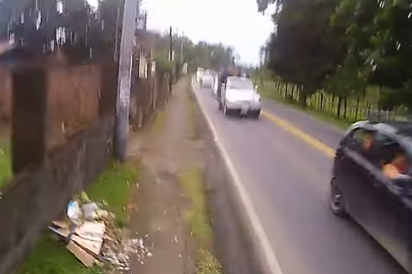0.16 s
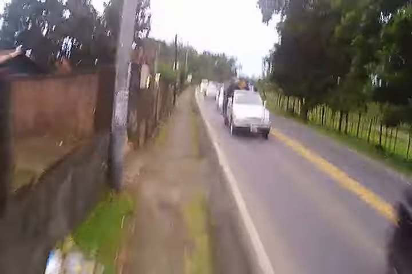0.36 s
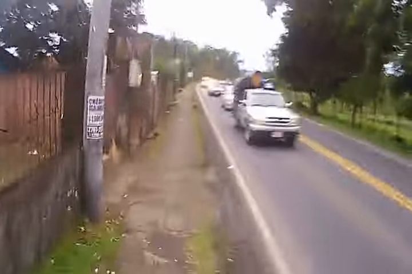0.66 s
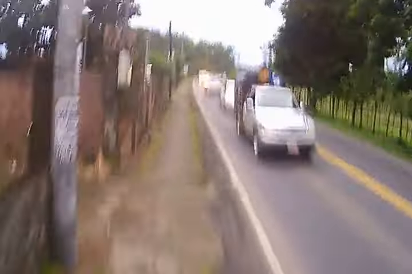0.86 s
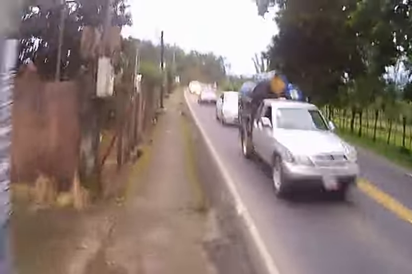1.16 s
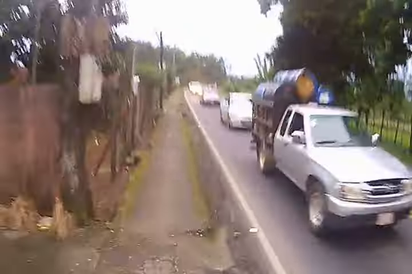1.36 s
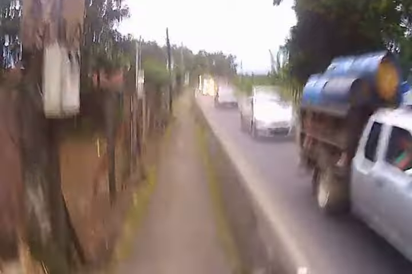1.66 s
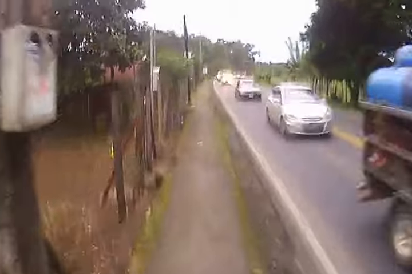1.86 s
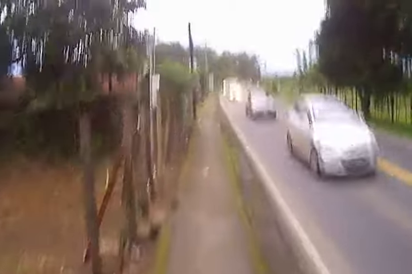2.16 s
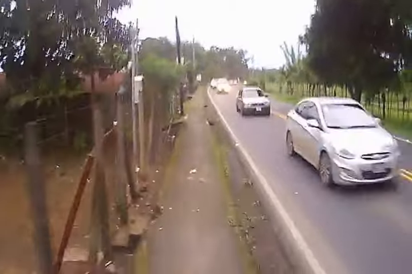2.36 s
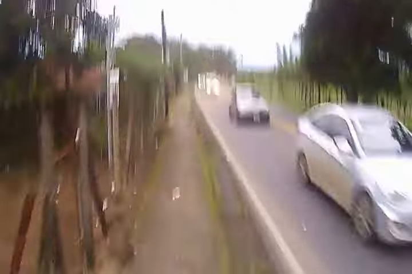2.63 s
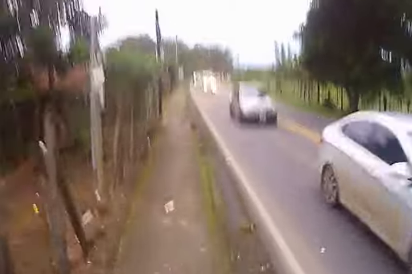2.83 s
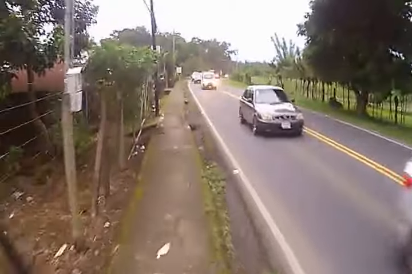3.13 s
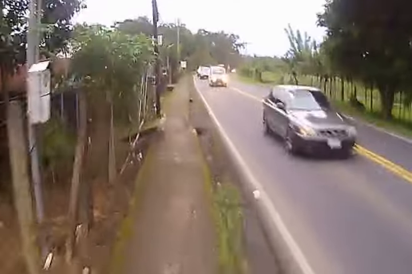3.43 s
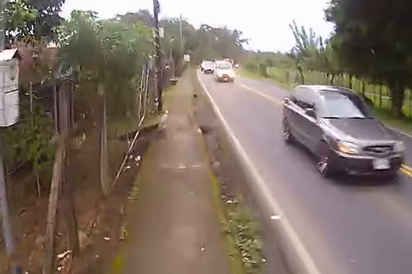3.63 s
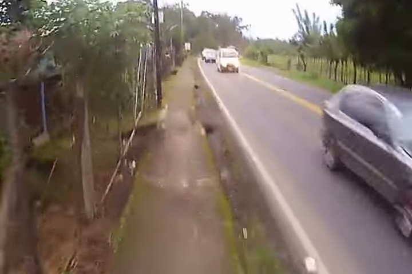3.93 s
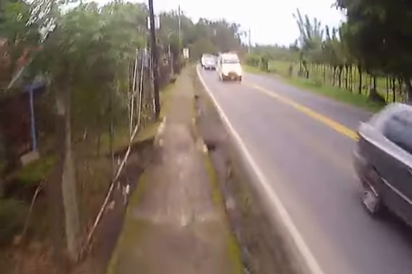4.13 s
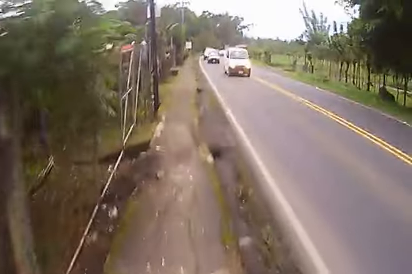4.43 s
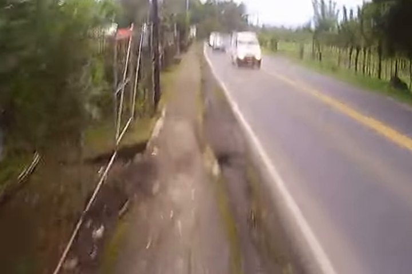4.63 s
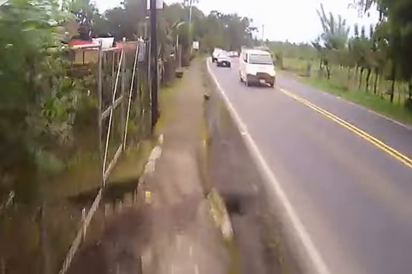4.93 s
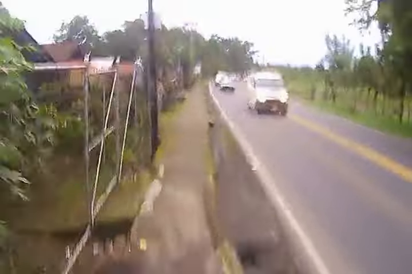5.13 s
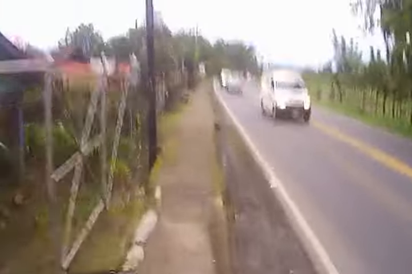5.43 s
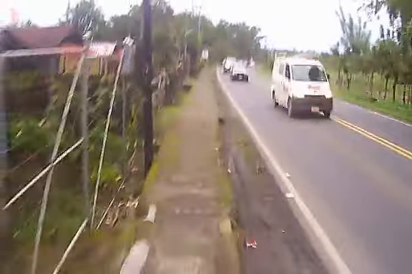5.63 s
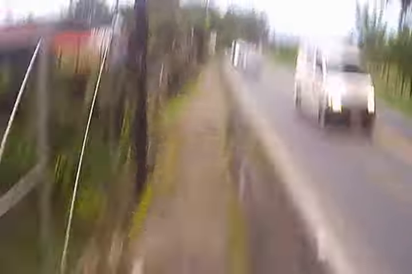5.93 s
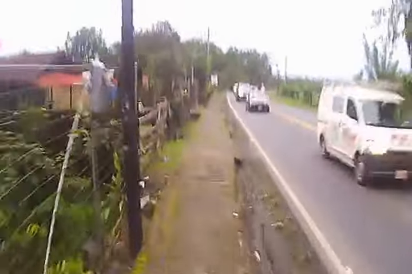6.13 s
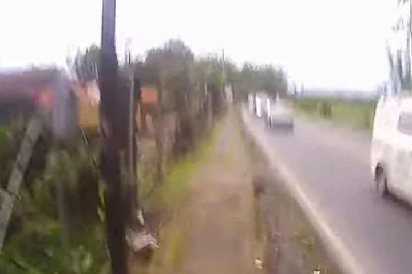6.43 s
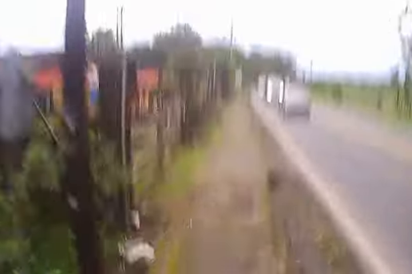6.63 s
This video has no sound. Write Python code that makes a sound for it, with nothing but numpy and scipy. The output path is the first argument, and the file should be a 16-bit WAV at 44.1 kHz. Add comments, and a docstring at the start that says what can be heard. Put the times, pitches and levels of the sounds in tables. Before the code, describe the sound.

A loose plastic camera case knocks and rattles in quick dry clusters over low ride rumble, with deep bump thuds peaking midway.

```python
"""On a rough path beside a country road, a camera in a plastic case rides on a bicycle.
The loose case knocks in its mount in quick clusters: short contact forces ring its modes.
Bumps shake the mount with deep heaves (smooth pulses) and thuds (damped low modes), and set it
creaking (bursts of band-passed noise) and chattering (random soft contacts).
Under them lie the steady rumble of the ride, road noise and a faint hiss, all shaped from noise."""
import sys
import numpy as np
from scipy import signal
from scipy.fft import rfft, irfft
from scipy.io import wavfile
from scipy.ndimage import uniform_filter1d

SR = 44100
rng = np.random.default_rng(int(sys.argv[2]) if len(sys.argv) > 2 else 0)


def master_out(mix):
    """Clip the mix to full scale and print it as 16-bit PCM to the path in sys.argv[1]."""
    frames = np.transpose(np.atleast_2d(mix))
    ceiling = np.clip(frames, -1, 1)
    pcm = np.round(ceiling * 32767).astype(np.int16)
    wavfile.write(sys.argv[1], SR, pcm)


N = 298998
TIME = np.arange(N) / SR


def undb(db):
    """Level to amplitude: twenty decibels are a factor of ten."""
    return 10 ** (np.asarray(db) / 20)


def unit(x):
    """Normalisation to an rms of 1."""
    return x / np.sqrt(np.mean(x ** 2))


def add(track, start_s, sound):
    """Superposition: mix a sound into a track at a given time."""
    i = max(int(start_s * SR), 0)
    part = sound[:max(N - i, 0)]
    track[i:i + len(part)] += part


def filtered(x, hz, kind, order=2):
    """Butterworth low-pass or high-pass, maximally flat in its passband."""
    sos = signal.butter(order, min(hz, SR * 9 / 20), kind, fs=SR, output="sos")
    return signal.sosfilt(sos, x)


def resonance(x, hz, width_hz):
    """Two-pole resonator: a band-pass around one frequency."""
    b, a = signal.iirpeak(min(hz, SR * 9 / 20), hz / width_hz, fs=SR)
    return signal.lfilter(b, a, x)


def noise(points):
    """Spectral shaping: white noise weighted by (Hz, dB) points, then scaled to rms 1."""
    hz, db = np.transpose(points)
    f = np.maximum(np.fft.rfftfreq(N, 1 / SR), 1)
    weight = undb(np.interp(np.log(f), np.log(hz), db))
    return unit(irfft(rfft(rng.standard_normal(N)) * weight, N))


def walk(rate):
    """Smoothed random steps, rate per second: a slow drift with an rms of 1."""
    k = int(SR / rate)
    steps = np.repeat(rng.standard_normal(N // k + 1), k)
    return unit(uniform_filter1d(steps, k)[:N])


def bands(rows):
    """Noise-fed narrow resonances, each with its own amplitude and frequency modulation."""
    out = 0
    for hz, width_hz, db in rows:
        band = rng.standard_normal(N)
        for _ in range(2):
            band = resonance(band, hz, 0.93 * width_hz)
        waver_db = 1.7 * walk(9) + .7 * walk(2)
        drift_hz = 20 * walk(4)
        # turning the phase of the analytic signal shifts the pitch
        turn = np.exp(2j * np.pi * np.cumsum(drift_hz) / SR)
        band = (signal.hilbert(band) * turn).real
        out = out + undb(db + waver_db) * unit(band)
    return out


def ride(rumble_db=-47, road_db=2.0, hiss_db=-77, hiss_top_hz=11900):
    """Stationary broadband rumble, road noise coloured by cavity resonance, hiss and thin tones."""
    # Steady rumble of the ride, tyres and traffic heard through the case.
    # Each row: frequency in Hz, relative spectral level in dB per Hz.
    rumble_spectrum = [(10, 1), (20, -8), (30, -17.5), (45, -28), (70, -29.5), (120, -48), (195, -42.5),
                       (350, -48.5), (600, -52), (1000, -52.5), (2000, -59.5), (3000, -68), (8000, -103)]
    # Air resonances of the case. Each row: frequency in Hz, nominal width in Hz, relative level in dB.
    hollow_bands = [(1282, 160, -99), (1576, 320, -95.5), (1896, 210, -95.5)]
    # Loudness of tyres and traffic. Each row: time in seconds, level in dB before road_db.
    road_level = [(0.03, -80), (1.35, -85.5), (3.5, -86), (3.76, -78), (3.91, -71), (4.15, -81.5),
                  (6.51, -82), (6.7, -81.5)]
    # Thin whine in the hiss. Each row: frequency in Hz, nominal width in Hz, level in dB before its course.
    whine_bands = [(8600, 480, -89.5)]
    # The whine comes and goes. Each row: time in seconds, gain in dB.
    whine_course = [(.7, -11), (1, 0), (1.6, 0), (2, -9), (3.1, -10), (3.35, 0), (4.1, 0), (4.5, -8),
                    (5.4, -9), (5.7, -1), (6.45, -1), (6.65, -9)]
    # Fainter whistle above it. Each row: frequency in Hz, nominal width in Hz, level in dB before wavering.
    whistle_bands = [(13720, 180, -93)]
    rumble = undb(rumble_db) * noise(rumble_spectrum)
    road = undb(road_db + np.interp(TIME, *np.transpose(road_level))) * unit(bands(hollow_bands))
    hiss = undb(hiss_db) * filtered(rng.standard_normal(N), hiss_top_hz, "low", order=1)
    whine = undb(np.interp(TIME, *np.transpose(whine_course))) * bands(whine_bands)
    return rumble + road + whine + bands(whistle_bands) + hiss


def contacts(rebound_tick_db=11.5):
    """Rebound after impact: yields each contact's time (s), level, low ring and hard tick (dB)."""
    # The loose case clacks against its mount and rebounds. Each row: start in seconds, level in dB,
    # hollow low ring in dB, hard tick in dB, delay of the rebound in seconds, its relative level in dB.
    knock_rows = [(.438, -54.5, 3, 7, 0.0063, 0.5), (0.4539, -66, 2, 0, .002, -11),
                  (.495, -54, 0, -15, 0.0041, -12), (.6155, -82, -6, -2, .002, -20),
                  (.632, -54, 5, 5, 0.0043, -0.5), (0.669, -50.5, -3, -6, 0.0026, -29),
                  (.932, -49, 4, -4, 0.0051, -7.5), (0.9546, -62, -1, 17.5, 0.0021, -12),
                  (0.9996, -66, -3, -5, 0.0014, -17), (1.0328, -53, 4.5, -11, 0.0033, -12),
                  (1.3557, -58, 7, 5, 0.0054, -19), (1.379, -55, 10, -41, 0.0028, -41),
                  (1.4295, -54, 5.5, -1, 0.0036, -18), (1.4756, -61, 13, -16, 0.0034, -32),
                  (1.7795, -54, 5.5, -8, 0.011, -10), (1.989, -59, 8.5, -19, 0.0046, -3.5),
                  (2.021, -62, 9, -31, 0.0027, -18), (2.1302, -61.5, 7, 1, 0.0029, -4),
                  (2.1736, -57, 6, -15, 0.0012, -13), (2.2321, -50.5, 4.5, 15.5, 0.0017, -13.5),
                  (2.2565, -59, -8, 20, 0.0034, -19), (2.306, -60.5, 13, 9, 0.0044, -16),
                  (2.453, -53.5, 7, -4, 0.006, -11), (2.517, -66, 16, -29, 0.0045, -21),
                  (2.5717, -55.5, 5, -19, 0.0023, -27), (2.7851, -53, 8.5, -34, 0.013, -28),
                  (2.8573, -56.5, -12, 8, 0.0035, 6.5), (2.9505, -55, -4, 6.5, 0.0031, -9),
                  (2.973, -56.5, 9.5, -23, 0.0016, -24), (3.094, -41.5, 0, -19, 0.007, -12),
                  (3.1022, -56, -13, 15.5, 0.0029, -11.5), (3.179, -60.5, 7, -38, 0.0047, -22),
                  (3.251, -62, -6, 6, 0.0021, -34), (3.402, -61, -10, -3, 0.0024, -6),
                  (3.417, -50, 2, -33, 0.0037, -26.5), (3.493, -51.5, 0, 12, 0.0045, 0),
                  (3.5452, -54, 8.5, -11, 0.0039, -8), (3.708, -50.5, -1.5, 12, 0.004, 1),
                  (3.7542, -49, 0, 4, 0.0031, -23), (3.8425, -46, 2.5, 27.5, 0.0021, -10),
                  (3.862, -57, 2, 12, 0.0022, -12), (3.8832, -46.5, 0, 24.5, 0.0016, -33),
                  (3.8857, -46, -2, 20.5, 0.00091, -31), (3.89, -52, 4, 18, 0.0014, -19),
                  (3.953, -55.5, -6, 13.5, 0.0042, 5.5), (4.0285, -47.5, 7, 11, 0.0031, -11.5),
                  (4.1352, -63.5, 12, -22, 0.0019, -26), (4.203, -54, 2, -10, 0.00272, -8),
                  (4.4067, -48, 8, -13, 0.0067, -4), (4.452, -55, 8, -7.5, 0.0037, -23),
                  (4.4936, -63.5, -13, 4, .003, -14), (4.634, -62.5, 12.5, -4, .005, -2.5),
                  (4.647, -74.5, 13, -17, .012, 4), (4.717, -51, 1.5, -9, 0.0057, -6),
                  (4.753, -50.5, 5, -4, 0.0057, -16), (4.8447, -47, -7.5, 25.5, 0.008, -10.5),
                  (4.892, -58, -5, 3, 0.0035, -3), (4.9028, -52.5, 1, 14.5, 0.0013, -17),
                  (5.1444, -68.5, 11, -2, 0.0012, -10), (5.4395, -50, 3.5, 13, 0.0053, 0),
                  (5.454, -66, -12, 17, 0.0012, -5), (5.5499, -54.5, -14, -10, 0.0058, -1),
                  (5.767, -50.5, 3, 5, 0.0067, -4.5), (5.847, -53, -10, -3, 0.005, -2),
                  (6.0892, -46, -8, 4, .003, -11.5), (6.0951, -52.5, 3, -9, 0.0033, 1),
                  (6.1757, -52, 5, -17, 0.0043, -8), (6.4256, -53.5, -1, 0.5, 0.0059, 0.5),
                  (6.5188, -50.5, 2, -8, 0.0055, -7.5), (6.649, -68, 16, -35, 0.0045, -15),
                  (6.7234, -57, -21, 6.5, 0.0081, -5), (6.754, -64.5, 12, -37, 0.0029, -20)]
    for s, db, hollow_db, tick_db, after_s, rebound_db in knock_rows:
        yield s, db, hollow_db, tick_db
        # a rebound lands on the edge of the case and ticks harder
        yield s + after_s, db + rebound_db, hollow_db, tick_db + rebound_tick_db


def contact(hollow_db, tick_db, scatter_db=2.5, treble_share=0.18, grit_hz=2200, rise_s=0.0001,
            softening=0.021):
    """Modal synthesis: a brief contact force convolved with the case's decaying modes."""
    # Modes of the case. Each row: nominal frequency in Hz, time to fall by 60 dB in seconds,
    # level in dB before colour and scatter, polarity as a sign.
    case_modes = [(413, 0.027, -30, 1), (521, 0.028, -23, 1), (725, 0.02, -15, 1), (890, 0.013, -6.5, 1),
                  (1338, 0.017, -3, 1), (1625, 0.01, -7.5, 1), (1875, 0.0093, 2.5, 1), (2220, 0.0057, 1, 1),
                  (2790, 0.0018, 4.5, 1), (3886, 0.0033, -12, 1), (4430, 0.0025, -12.5, -1),
                  (5630, 0.009, -14.5, 1), (6230, 0.004, -5, 1), (8400, 0.0048, -10.5, 1),
                  (11940, 0.0051, -10.5, 1)]
    hz, t60, db, polarity = np.transpose(case_modes)
    t = TIME[:SR // 40]
    chance = rng.standard_normal((2, len(hz)))
    # where and how hard the contact lands decides the share of each mode
    corner_hz = [800, 1300, 2550, 3800, 4400, 6200]
    corner_db = [hollow_db, 0, 0, tick_db, tick_db, treble_share * tick_db]
    colour_db = np.interp(np.log(hz), np.log(corner_hz), corner_db)
    gain = np.sign(polarity) * undb(db + colour_db + scatter_db * chance[0])
    # all modes shift together with the force, and each a little with its place
    detune, mode_detune = .022, .022  # spreads, as shares of the frequency
    mode_hz = hz * (1 + detune * rng.standard_normal() + mode_detune * chance[1])
    pole = 2j * np.pi * mode_hz - np.log(1000) / t60
    ring = gain @ np.exp(np.outer(pole, t)).imag
    # a soft contact pushes longer
    ring = ring * (1 - np.exp(-t / (rise_s * undb(-softening * tick_db))))
    # the faces scrape dully for a moment after they meet
    scrape_s, grit = .004, .5
    scrape = grit * rng.standard_normal(len(t)) * np.exp(-t / scrape_s) / np.sqrt(scrape_s * SR)
    push = filtered(scrape, grit_hz, "low")
    # they also skitter: ever weaker touches of random sign, 0.4 to 1.6 ms apart
    strengths = np.array([.92, .38, .24])
    touches = np.cumsum(rng.uniform(.0004, .0016, len(strengths)))
    touch_samples = ((touches - touches[0]) * SR).astype(int)
    push[touch_samples] += strengths * rng.choice([-1, 1], len(strengths))
    return signal.fftconvolve(ring, push)


def knocks(gain_db=4.0, bounce_db=-15, bounce_s=0.0088, dull_db=-4, low_hz=360, top_hz=7500):
    """Inelastic impact: each contact settles with a weaker, duller bounce milliseconds later."""
    out = np.zeros(N)
    for s, db, hollow_db, tick_db in contacts():
        add(out, s, undb(db) * contact(hollow_db, tick_db))
        bounce = contact(hollow_db, min(tick_db, 0) + dull_db)
        add(out, s + bounce_s * rng.uniform(0.429, 1.8), undb(db + bounce_db) * bounce)
    # a small case gives little bass, and its plastic rounds the edge of each blow
    out = filtered(out, low_hz, "high")
    return undb(gain_db) * filtered(out, top_hz, "low", order=1)


def heaves(shake_s=0.017):
    """Pulse displacement: a swell with a dip on either side; also returns the shaking's envelope."""
    # Bumps heave the camera up and let it down again.
    # Each row: centre in seconds, peak level in dB, time constant of the swell in seconds.
    heave_rows = [(0.866, -36.5, 0.0081), (1.476, -46.5, 0.012), (1.898, -32, 0.017), (2.348, -26.5, 0.012),
                  (2.907, -34, 0.013), (3.04, -36, 0.011), (3.146, -32.5, 0.019), (3.544, -29.5, 0.017),
                  (3.579, -33.5, 0.0079), (3.752, -27, 0.013), (3.799, -31.5, 0.019), (3.887, -23, 0.011),
                  (3.9214, -17, 0.012), (3.974, -24, .011), (4.028, -29, 0.02), (4.072, -21, 0.012),
                  (4.379, -31.5, 0.013), (4.453, -29, 0.01), (4.521, -35, 0.013), (4.803, -32.5, 0.01),
                  (4.889, -38, 0.016), (4.94, -27.5, .011), (5.004, -42, 0.011), (5.455, -37.5, .009),
                  (5.603, -40.5, 0.011), (5.897, -36.5, 0.0072), (6.22, -28.5, 0.013)]
    out, shake = np.zeros(N), np.zeros(N)
    t = TIME[:SR // 2] - 1 / 4
    for s, db, length_s in heave_rows:
        swell = 1 / np.cosh(t / length_s)
        add(out, s + t[0], undb(db) * swell * (2 * swell ** 2 - 1))
        add(shake, s + t[0], undb(db) / np.cosh(t / shake_s))
    return out, shake


def judder(shake, judder_db=-23):
    """Amplitude modulation: low noise follows the uneven shaking of the frame during a bump."""
    # Each row: frequency in Hz, relative spectral level in dB per Hz.
    judder_spectrum = [(10, -32), (22, -1.5), (42, -2), (70, -12), (100, -10), (150, -18), (200, -29),
                       (500, -43), (2000, -65), (8000, -110)]
    return undb(judder_db) * shake * noise(judder_spectrum)


def thuds(rise_s=0.0014, soft_hz=340):
    """Damped oscillation: the stop checks the swing and the camera sways back on its mount."""
    # Sway of the camera on its mount. Each row: frequency in Hz, decay constant in seconds, level in dB.
    mount_modes = [(35.6, 0.037, 1), (124, 0.0089, -24)]
    # The mount runs into its stop. Each row: start in seconds, level in dB before the low-pass.
    thud_rows = [(0.8663, -42), (1.8706, -47.5), (1.909, -32), (2.3327, -36), (2.3428, -48), (2.3698, -42),
                 (2.9095, -31), (3.0378, -42.5), (3.2416, -45.5), (3.5808, -36.5), (3.809, -39.2),
                 (3.871, -31), (3.884, -30.5), (3.9339, -28.5), (3.998, -59), (4.0533, -41),
                 (4.0948, -29.5), (4.1586, -45), (4.3783, -38.5), (4.4126, -35.5), (4.808, -35.5),
                 (4.9257, -35), (4.9725, -38.5), (5.6066, -45), (5.8968, -41.5), (6.189, -42),
                 (6.228, -29.5)]
    out, t = np.zeros(N), TIME[:SR // 4]
    sway = 0
    for hz, decay_s, db in mount_modes:
        sway = sway + undb(db) * np.exp(-t / decay_s) * np.cos(2 * np.pi * hz * t)
    sway = sway * (1 - np.exp(-(t / rise_s) ** 2))
    for s, db in thud_rows:
        add(out, s, undb(db) * sway)
    # an ordinary knock jolts the whole mount only a little, a hard one far more
    usual_db, jolt_db, jolt_per_db = -50, -51, 1.8
    for s, db, _, _ in contacts():
        add(out, s, undb(jolt_db + jolt_per_db * (db - usual_db)) * sway)
    return filtered(out, soft_hz, "low")


def chatter(shake, chatter_db=-41, threshold=0.007, hollow_db=6, tick_db=-10, soft_hz=1600):
    """Random point process: under hard shaking the case trembles in soft contacts on its mount."""
    out = np.zeros(N)
    rate, spread_db = 130, 2.5  # contacts per second of hard shaking, spread of their level
    struck = (rng.random(N) < rate / SR) & (shake > threshold)
    for i in np.flatnonzero(struck):
        strength = shake[i] * undb(chatter_db + spread_db * rng.standard_normal())
        add(out, i / SR, strength * contact(hollow_db, tick_db))
    return filtered(filtered(out, 280, "high"), soft_hz, "low", order=6)


def creaks(gain_db=1.0, length_s=0.0019, width_hz=800, top_hz=2150):
    """Friction: plastic slips on flexing plastic, a short noise burst sung roughly around one pitch."""
    # Each row: centre in seconds, level in dB before gain and low-pass, pitch in Hz.
    creak_rows = [(1.871, -66, 1880), (1.884, -61, 1700), (1.899, -57.5, 1610), (1.91, -63, 1400),
                  (2.327, -57.5, 1720), (2.35, -63, 1480), (2.911, -61, 1480), (3.582, -66, 1090),
                  (3.701, -59, 1424), (3.804, -64.5, 1400), (3.874, -49.5, 1870), (3.878, -49, 1452),
                  (3.908, -60, 1610), (3.923, -48, 1870), (3.936, -58, 1390), (4.005, -59, 1500),
                  (4.047, -55, 1400), (4.056, -55, 1590), (4.075, -60, 1770), (4.082, -59, 1400),
                  (4.097, -57.5, 1830), (4.379, -58, 1380), (4.809, -63.5, 1360), (4.922, -64.5, 1390),
                  (6.2, -61, 1420), (6.221, -57, 1572), (6.228, -59, 1300)]
    out = np.zeros(N)
    t = TIME[:SR // 25] - 1 / 50
    swell = np.exp(-(t / length_s) ** 2 / 2)
    for s, db, hz in creak_rows:
        rub = rng.standard_normal(len(t))
        for _ in range(2):
            rub = resonance(rub, hz, width_hz)
        rub = swell * rub
        # each burst gets the same strength whatever its random draw
        add(out, s + t[0], undb(db + gain_db) * rub * np.std(swell) / np.std(rub))
    return filtered(out, top_hz, "low", order=6)


def scene():
    """Superposition: everything reaches the microphone through the case, with no room around it."""
    heave, shake = heaves()
    mix = ride() + knocks() + heave + judder(shake) + thuds() + chatter(shake) + creaks()
    return mix[None]


def record(dry, top_hz=15400, offset=-.0237):
    """Band limiting and bias: the camera cuts the top and its converter sits a little below zero."""
    sos = signal.ellip(8, .2, 70, top_hz, fs=SR, output="sos")
    return signal.sosfilt(sos, dry) + offset


dry = scene()
out = record(dry)
master_out(out)
```